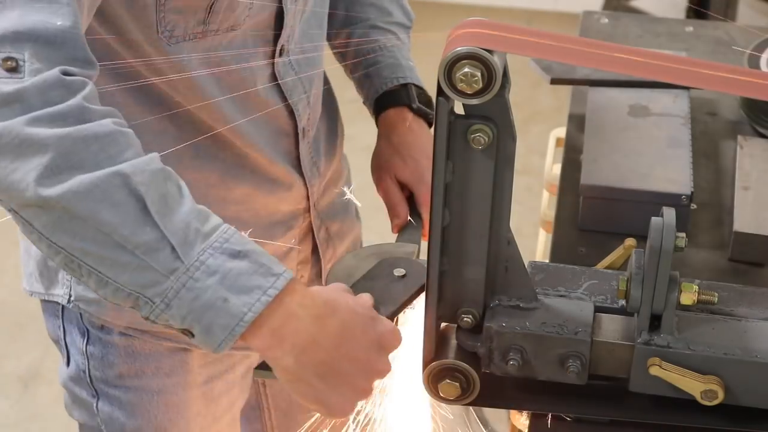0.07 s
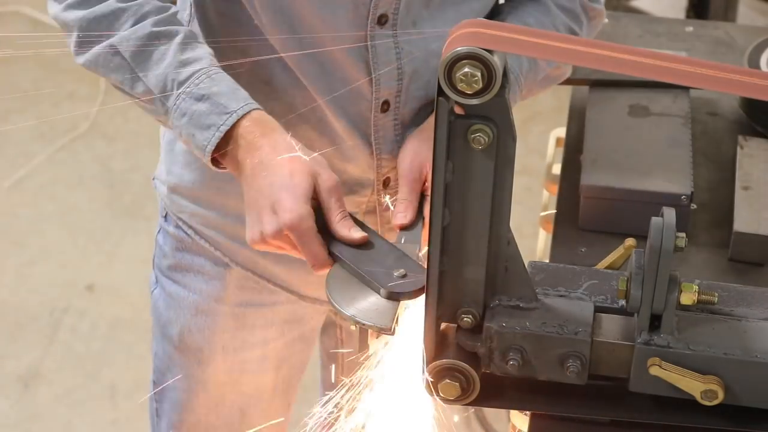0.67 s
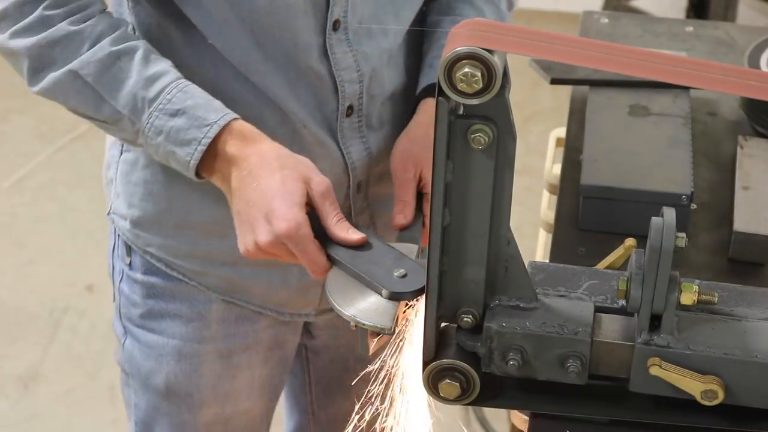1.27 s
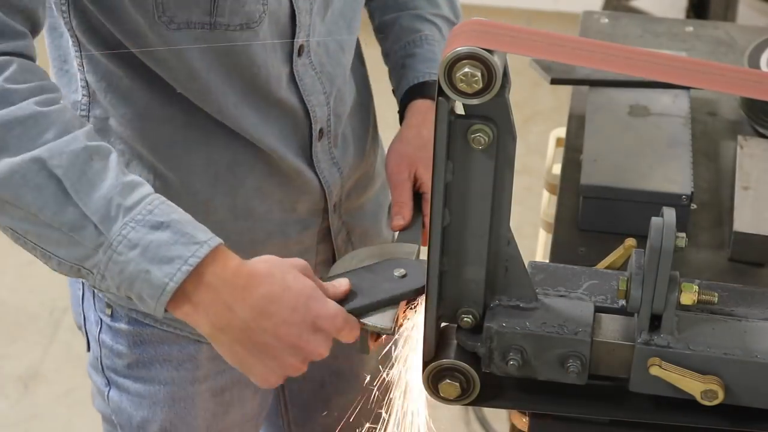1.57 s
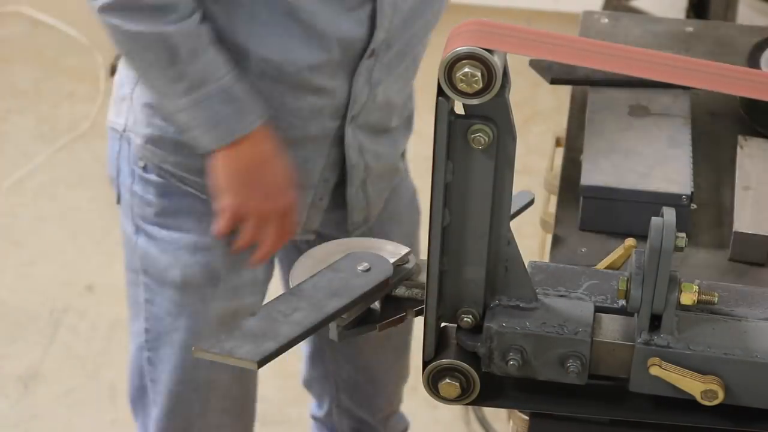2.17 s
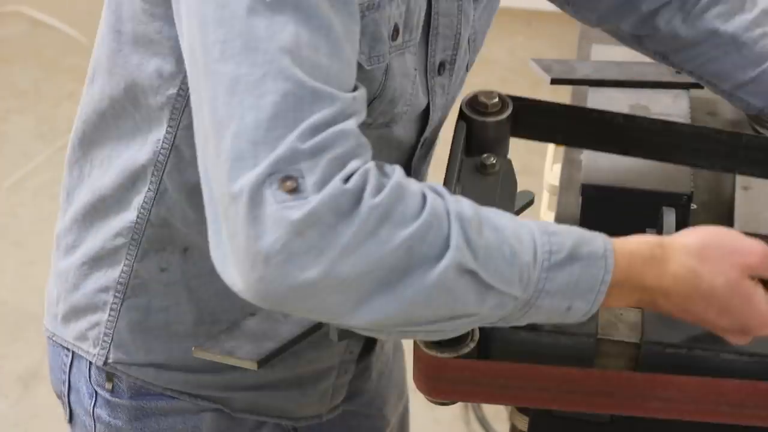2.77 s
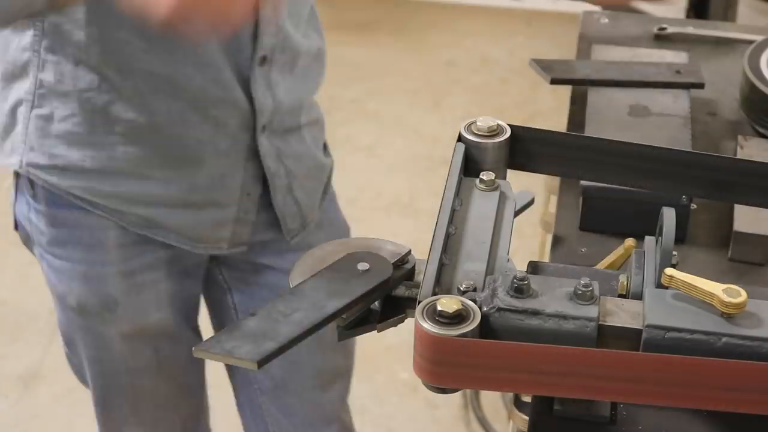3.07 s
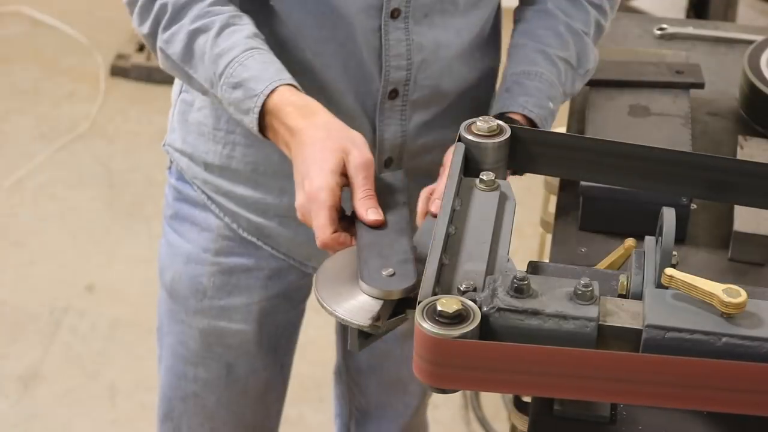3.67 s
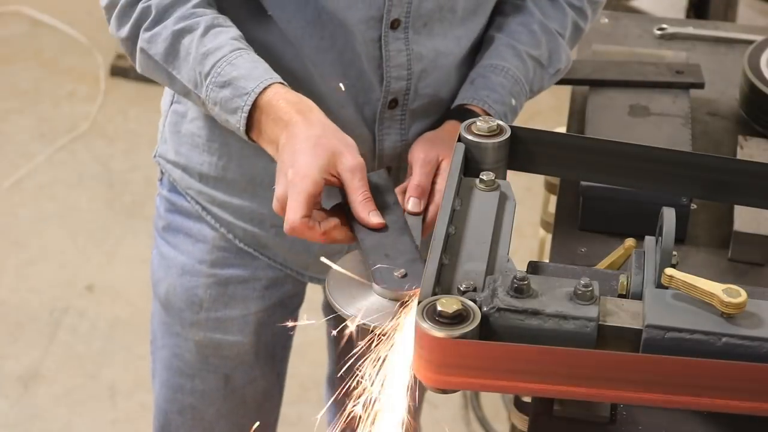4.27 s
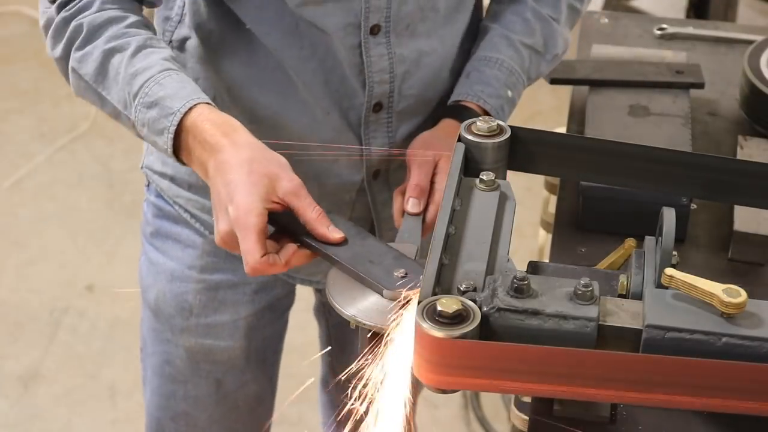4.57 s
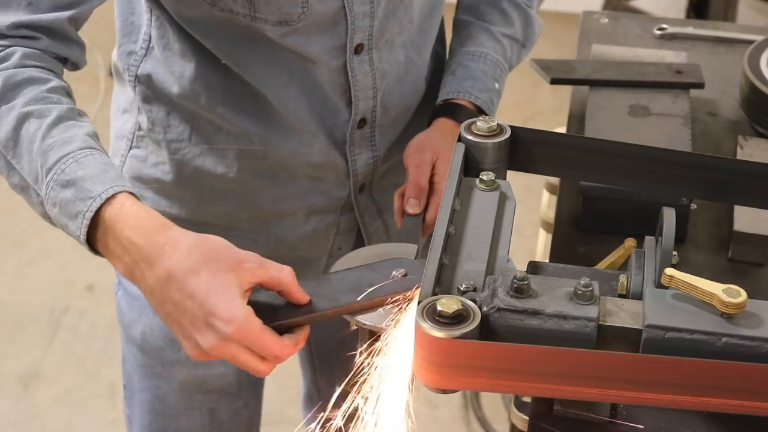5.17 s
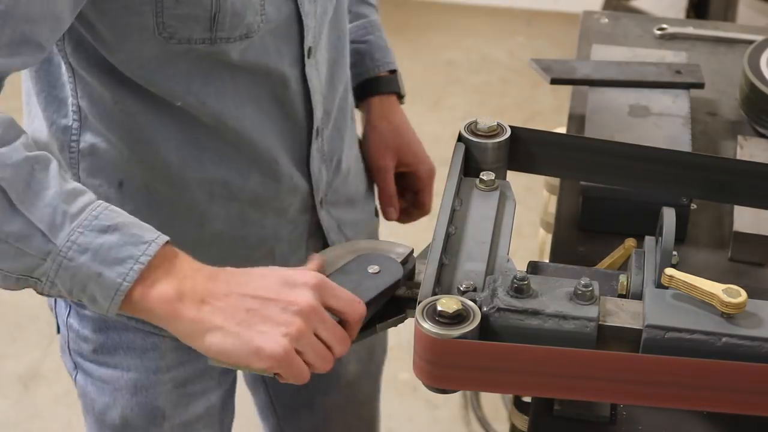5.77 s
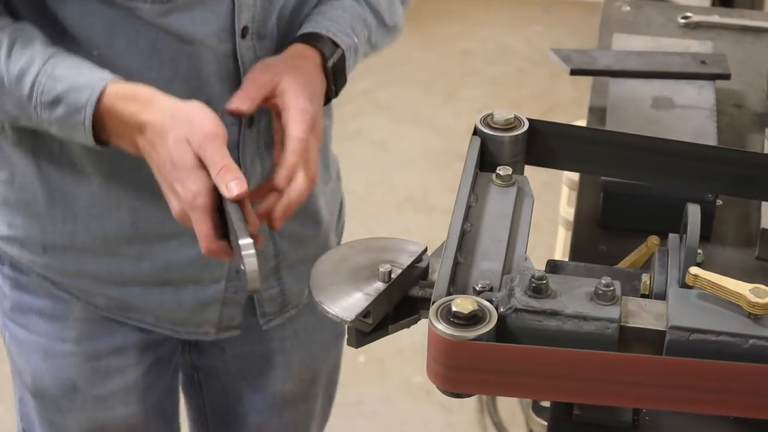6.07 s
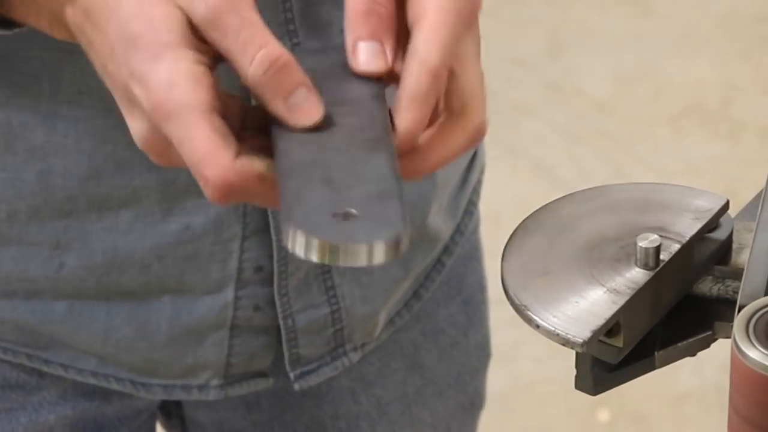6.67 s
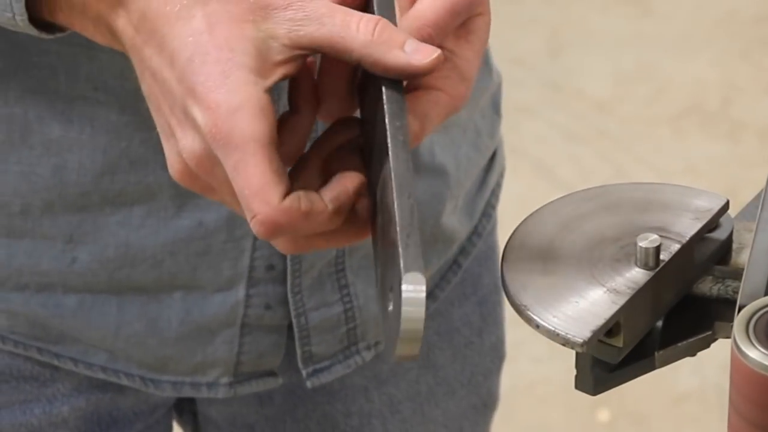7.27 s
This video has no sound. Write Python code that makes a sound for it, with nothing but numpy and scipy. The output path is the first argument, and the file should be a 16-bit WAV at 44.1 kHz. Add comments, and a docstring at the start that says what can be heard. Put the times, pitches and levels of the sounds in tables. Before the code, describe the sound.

A belt grinder whines, sped up and high-pitched, while a steel plate hisses and screeches against it in two passes. The machine winds down, and its metal arm is moved and clamped with a clatter of clicks and knocks. It runs up again for another, softer grinding pass. Then the sound drops abruptly to a lower, fuller, fluttering hum of the free-running belt, heard close in a quiet workshop.

```python
"""A belt grinder in time-lapse, every pitch raised: the belt laps about 102 times a second.
A steel plate is pressed on twice, hissing and screeching under the grit while the wheels sing.
The machine coasts to rest, its arm is swung over and clamped with a clatter of knocks,
then it runs up and grinds again. At about 6 s the time-lapse drops to a quarter of its pace
and the belt runs free, lower and fuller, over a quiet workshop."""
import sys
import numpy as np
from scipy import signal
from scipy.fft import rfft, irfft, next_fast_len
from scipy.io import wavfile

SR = 44100
rng = np.random.default_rng(int(sys.argv[2]) if len(sys.argv) > 2 else 0)


def wav_out(sig):
    """Save sig, one row per channel (or a flat mono array), as 16-bit PCM at SR to the path in sys.argv[1]."""
    wavfile.write(sys.argv[1], SR, np.round(np.clip(np.atleast_2d(sig).T, -1, 1) * 32767).astype(np.int16))


N = 331191
T = np.arange(N) / SR
FAST_LAPS_PER_S, SLOW_LAPS_PER_S = 102.28, 25.595
SWING_S, PACE_CHANGE_S = 2.8, 6.052


# The hand's passes. Each row: start and end, press-on and lift-off time, moment and width of the
# hardest push, all in seconds; dB lighter away from that push; hiss, ring and screech level in dB.
PASSES = [(-.05, 0.027, .02, 0.024, -5, .1, 0, -35.5, -35, -34),
          (0.074, 0.95, 0.041, .06, .66, 0.18, 5, -34, -39.5, -33.5),
          (1.124, 1.869, .1, 0.066, 1.4, 0.24, 12.5, -42.5, -40.5, -36.5),
          (4.189, 5.621, .1, 0.092, 4.8, 0.36, 0, -41, -46.5, -44)]
def pressing(start, end, on_s, off_s, hardest_s, push_s, lighter_db):
    """One pass of the hand: contact (0-1) comes and goes, and pressure (dB) swells in one push."""
    contact = np.clip((T - start) / on_s, 0, 1) * np.clip((end - T) / off_s, 0, 1)
    return contact, lighter_db * (np.exp(-((T - hardest_s) / push_s) ** 2) - 1)


# The plate rings differently in each grip. Each row: pitch in Hz, width in Hz, relative level in dB,
# dB gained per second as the contact slides along the edge.
FIRST_GRIP = [(816, 13, -7.5, -1), (1803, 113, 4.5, 0), (1955, 45, 1, 21), (2055, 51, 6.5, 6),
              (3013, 144, 5.5, -10), (4910, 260, 1, -2), (5027, 100, 6, 2), (5260, 41, 8, 2),
              (10100, 95, -5, -11), (10700, 220, -4.5, -10), (12400, 410, -11, 4)]
SECOND_GRIP = [(1768, 190, -2, 4), (2005, 140, -0.5, 7), (3000, 106, -3.5, 4), (4825, 160, 2, 18),
               (5170, 210, -1, 11), (6960, 580, -10.5, 8), (9600, 260, -9, 5), (12140, 400, -4.5, 16)]
THIRD_GRIP = [(974, 210, -8, 3), (1720, 640, -4, 1.5), (2262, 26, 10, 0), (3200, 630, -7.5, -3),
              (4320, 98, 1.5, 1), (5030, 400, -2.5, -6), (10370, 480, -1.5, 2), (15200, 300, 0.5, 2)]
def grinding(laps):
    """Grit tears at the steel: a bright hiss, with the plate ringing and screeching in step."""
    out, screech_hz = np.zeros(N), 4000
    follow = (0.64, 0.43, 1)  # hiss, ring, screech: dB per dB of pressure
    for row, grip in zip(PASSES, (FIRST_GRIP, FIRST_GRIP, SECOND_GRIP, THIRD_GRIP)):
        start, end = row[:2]
        contact, pressure_db = pressing(*row[:7])
        slide_s = np.clip(T, start, end) - (start + end) / 2
        bite = grit(laps, repeat=.58, wear_per_s=6, uneven_db=1.5, lumpy_db=2)
        chatter = grit(laps, repeat=0.84, wear_per_s=4, uneven_db=0.5, lumpy_db=1.8)
        hiss = coloured(bite, [(30, -10), (120, -20), (500, -30), (900, -25.5), (1600, -5.5),
                               (4000, 1.5), (8000, 0.5), (11000, 2), (16000, 4.5)])
        modes = [(hz, gain_of(db + trend_db * slide_s) * ring_twice(chatter, [(hz, width, 0)]))
                 for hz, width, db, trend_db in grip]
        ringing = sum(mode for hz, mode in modes if hz < screech_hz)
        screech = sum(mode for hz, mode in modes if hz >= screech_hz)
        hand = contact * gain_of(.5 * drift(25))
        for layer, db, slope in zip((hiss, ringing, screech), row[7:], follow):
            out += hand * gain_of(db + slope * pressure_db) * layer / layer[contact > 0].std()
    return out


def grit(laps, repeat, wear_per_s, uneven_db, lumpy_db, harmonics=160, size=16384):
    """Grit on a closed belt: one pattern comes round each lap, wearing, mixed with fresh scraping."""
    place = np.arange(size) / size
    heights = gain_of(uneven_db * rng.standard_normal(harmonics)) * (np.arange(harmonics) > 4)
    loops = [irfft(heights * np.exp(2j * np.pi * rng.random(harmonics)), size) for _ in range(2)]
    old, new = (np.interp(laps, place, loop, period=1) for loop in loops)
    wear = drift(wear_per_s) / 2
    pattern = evened(old * np.cos(wear) + new * np.sin(wear))
    scrape = np.sqrt(repeat) * pattern + np.sqrt(1 - repeat) * rng.standard_normal(N)
    # thick and thin stretches of belt press harder and softer
    lumps = np.interp(laps, np.arange(20) / 20, evened(rng.standard_normal(20)), period=1)
    return evened(scrape * gain_of(lumpy_db * lumps))


def belt_speed():
    """Share of full speed: the belt coasts to rest, runs up evenly and sags under each pass."""
    off_s, coast_s, on_s, run_up_s = 2.117, .285, 3.08, .32
    sag_laps_per_s, sag_at_db = .3, -35  # speed lost at this level of hiss
    coasting = np.clip(1 - (T - off_s) / coast_s, 0, 1) ** 1.15
    running_up = np.clip((T - on_s) / run_up_s, 0, 1)
    sag = sag_laps_per_s * sum(pressing(*row[:7])[0] * gain_of(row[7] - sag_at_db) for row in PASSES)
    return np.maximum((coasting + running_up) * (1 - sag / FAST_LAPS_PER_S), .001)


# The bright rush of the fast belt. Each row: frequency in Hz, relative level in dB.
FAST_RUSH = [(15, -68), (25, -32), (361, -23.5), (473, -25), (857, -17), (929, -15), (1090, -9),
             (1220, -8.5), (1430, -12.5), (2390, -9), (3130, -12), (3680, -11), (3990, -10.5), (6490, -9),
             (15800, -9)]
# The steel platen's ring. Each row: pitch in Hz, width in Hz, relative level in dB.
PLATEN_MODES = [(1287, 100, -4.5), (1720, 68, 0), (4860, 340, 0.5)]
def machine(laps, speed):
    """The belt rushes over its ringing platen while wheels and bearing follow its speed."""
    halvings, upright = -np.log2(speed), T < SWING_S
    scrape = grit(laps, repeat=0.22, wear_per_s=8, uneven_db=1, lumpy_db=1.3)
    rush = gain_of(-39.5 - 5.5 * halvings + 0.54 * drift(30)) * coloured(scrape, FAST_RUSH)
    platen = gain_of(-59 - 2 * halvings) * evened(ring_twice(scrape, PLATEN_MODES))
    # a crawling belt only rattles; the wheels linger when coasting and come in late on the run-up
    moving = np.interp(speed, [.01, .15], [0, 1])
    singing = np.interp(speed, [.1, .8], [0, 1]) ** np.where(upright, .5, 2)
    whistling = np.interp(speed, [.1, .25], [0, 1])
    tones = singing * wheels(laps, speed, upright) + whistling * bearing(laps, upright)
    return rush + moving * platen + tones


# Three singing wheels. Each row: multiple of the lap rate, relative level in dB with the arm upright
# and swung over, dB gained while steel is pressed on, dB lost per halving of speed.
WHEEL_TONES = [(12, -56, -48.5, 2, 2), (37, -45.5, -43, -.5, 1.5), (61, -60, -48, -6, 16)]
# The lowest wheel beats against a near twin, first upright, then swung over. Each row: time of a dip
# in seconds, beat rate there in Hz, Hz lost per second, twin's strength from 0 to 1.
WHEEL_BEATS = [(1.11, 1.44, 0.075, 0.19), (3.77, 2.352, 0.45, 0.47)]
# Lesser machine tones. Each row: full-speed pitch in Hz, level in dB upright and swung over.
MACHINE_TONES = [(225, -81, -85), (304, -82.5, -80), (472, -70, -77), (601, -73, -75.5), (936, -63.5, -68),
                 (962, -84, -58), (1150, -79, -76), (1168, -85, -56), (1327, -57.5, -60.5),
                 (2250, -72, -56), (2333, -58, -60), (2457, -59.5, -58.5), (4815, -54.5, -54.5),
                 (6640, -59, -65), (10620, -55, -59), (11400, -51.5, -69)]
def wheels(laps, speed, upright):
    """The turning wheels sing over lesser machine tones, all falling in pitch as the belt slows."""
    out, halvings = np.zeros(N), -np.log2(speed)
    load = sum(pressing(*row[:7])[0] for row in PASSES)
    beat_db = np.where(upright, beating(*WHEEL_BEATS[0]), beating(*WHEEL_BEATS[1]))
    slack = 1 - speed ** 6  # a slack belt weakens the tones and breaks them up
    for k, (order, upright_db, swung_db, load_db, fade_db) in enumerate(WHEEL_TONES):
        db = np.where(upright, upright_db, swung_db) + load_db * load + (k == 0) * beat_db
        db += slack * (5 * drift(90) - 12) - fade_db * halvings
        song = tone(order * laps, db, waver_db=0.92, waver_per_s=30, slip=.06)
        out += radiated(order * FAST_LAPS_PER_S * speed) * song
    for hz, upright_db, swung_db in MACHINE_TONES:
        db = np.where(upright, upright_db, swung_db) - 3 * halvings + slack * (3 * drift(90) - 6)
        whine = tone(hz / FAST_LAPS_PER_S * laps, db, waver_db=0.4, waver_per_s=20, slip=0.16)
        out += radiated(hz * speed) / radiated(hz) * whine
    return out


def beating(dip_s, beat_hz, slowing, twin):
    """Level (dB) of two nearly equal tones drifting in and out of step."""
    turns = beat_hz * (T - dip_s) - slowing * (T - dip_s) ** 2 / 2
    return 20 * np.log10(abs(1 - twin * np.exp(2j * np.pi * turns)))


def radiated(hz):
    """The small frame hardly radiates low tones."""
    return 1 / np.sqrt(1 + (620 / hz) ** 8)


# The bearing's whistle. Each row: multiple of the lap rate (played rounded), relative level in dB
# upright and swung over.
BEARING_TONES = [(29, -49.5, -59), (66.6, -50.5, -66), (105, -59, -50.5)]
# Its housing. Each row: resonance in Hz, width in Hz, relative level in dB.
HOUSING_MODES = [(1000, 650, -3), (3320, 990, -7), (4880, 1050, -3.5), (5920, 370, -3.5)]
def bearing(laps, upright):
    """A bearing whistles, loudest while it sweeps through its housing's resonances."""
    whistle = np.zeros(N)
    for order, upright_db, swung_db in BEARING_TONES:
        db = np.where(upright, upright_db, swung_db)
        whistle += tone(round(order) * laps, db, waver_db=4.5, waver_per_s=90, slip=0.54)
    return ring_twice(whistle, HOUSING_MODES)


# The slow belt's fuller rush, its chirp and its hum. Each row: frequency in Hz, relative level in dB.
SLOW_RUSH = [(24, -89), (40, -52), (140, -26.5), (230, -24), (261, -12), (303, -4.5), (380, -14),
             (582, -11), (868, -17), (935, -9.5), (1010, -14), (1540, -12), (3890, -11), (4880, -7.5),
             (11100, -14.5), (15800, -21)]
CHIRP_TONES = [(4786, -45.5), (4963, -50.5), (7190, -54), (8958, -50), (11600, -55), (14100, -54)]
SLOW_HUM = [(236.9, -56), (307.2, -42), (333, -52), (538.3, -71), (584.3, -50), (689.1, -65), (946, -39.5),
            (1077, -59), (1200, -52.5), (1561, -45.5)]
def free_belt():
    """At the slow pace the laps are heard as a flutter, and the belt chirps on the platen twice a lap."""
    bump_s, dip_s = 6.903, 6.619
    laps = SLOW_LAPS_PER_S * T + 0.0002 * drift(18)
    scrape = grit(laps, repeat=0.65, wear_per_s=2.967, uneven_db=4, lumpy_db=-0.7, harmonics=640)
    rush = coloured(scrape, SLOW_RUSH)
    bumps = evened(np.exp(1.6 * np.cos(2 * np.pi * 2 * (laps - SLOW_LAPS_PER_S * bump_s))))
    # the platen's band is scooped out, so it falls quiet between the bumps
    out = gain_of(-30.5) * (rush - .5 * ring(rush, [(4770, 2350, 0)]))
    for hz, db in CHIRP_TONES:
        out += bumps * tone(hz * T, db, waver_db=0.5, waver_per_s=50, slip=0.9)
    for hz, db in SLOW_HUM:
        out += tone(hz * T, db - 1.1, waver_db=0.5, waver_per_s=30, slip=0.36)
    return out * np.clip(abs(T - dip_s) / 0.013, 0, 1)  # the level dips briefly


# The arm is swung over and clamped. Each row: start in seconds, relative click and thud level in dB.
ARM_KNOCKS = [(2.4522, -32.5, -66), (2.4695, -42, -77), (2.508, -37, -74), (2.5146, -33, -79),
              (2.5447, -42, -83), (2.565, -38.5, -75), (2.589, -46, -69), (2.597, -41, -60),
              (2.6104, -52, -48), (2.719, -50, -47.5), (2.752, -58, -48), (2.8529, -50, -71),
              (2.8812, -56, -46.5), (2.972, -56, -70), (3.036, -55, -81), (3.063, -42, -54.5),
              (3.093, -39.5, -62), (3.1228, -33, -65)]
# The steely click. Each row: resonance in Hz, width in Hz, relative level in dB.
ARM_MODES = [(2940, 1500, -3), (4800, 1000, -3), (7600, 1000, -2), (8840, 1400, 3), (11200, 3900, 1.5),
             (14100, 2000, -9)]
# The arm's lingering notes. Each row: pitch in Hz, seconds to fall 60 dB, relative level in dB.
ARM_RING = [(480, 0.081, -45), (3100, 0.1, -18), (4700, 0.14, -27), (7430, 0.2, -20)]
# The frame's dull thud. Each row: frequency in Hz, relative level in dB.
FRAME_THUD = [(60, -38), (250, -16), (500, 3.5), (1000, 9), (1800, 4), (3000, -7), (6000, -8), (16000, -35)]
def arm_knocks():
    """Each blow clicks, rings the steel arm and thuds in the frame; the loose arm rebounds once."""
    out, t = np.zeros(N), np.arange(SR // 4) / SR
    delays_s, rebound_db = rng.uniform(.012, .031, len(ARM_KNOCKS)), -22
    rebounds = [(start + delay, click_db + rebound_db, thud_db + rebound_db)
                for (start, click_db, thud_db), delay in zip(ARM_KNOCKS, delays_s)]
    click_shape = (np.exp(-t / 0.0049) + gain_of(-20.5) * np.exp(-t / 0.047)) * (1 - np.exp(-t / 0.00041))
    thud_shape = np.exp(-t / 0.028) * (1 - np.exp(-t / 0.0012))
    notes = sum(gain_of(db - 60 * t / t60) * np.sin(2 * np.pi * hz * t) for hz, t60, db in ARM_RING)
    for start, click_db, thud_db in list(ARM_KNOCKS) + rebounds:
        click = evened(ring(rng.standard_normal(len(t)), ARM_MODES)) * click_shape
        thud = coloured(rng.standard_normal(len(t)), FRAME_THUD) * thud_shape
        knock = gain_of(click_db - 6.5) * (click + notes) + gain_of(thud_db - 9.5) * thud
        at = round(start * SR)
        out[at:at + len(t)] += knock
    return out


# The room tone. Each row: frequency in Hz, relative level in dB.
ROOM_TONE = [(15, -45), (25, -8), (53, -27), (342, -17), (414, -6), (905, -2), (1640, -3), (3580, -8.5),
             (9210, -11.5), (15800, -16)]
def workshop():
    """A faint, steady bed of noise from the quiet workshop."""
    return gain_of(-74) * coloured(rng.standard_normal(N), ROOM_TONE)


def tone(turns, db, waver_db, waver_per_s, slip):
    """A rotating part's tone, wavering in strength and slipping in phase (radians)."""
    level = gain_of(db + waver_db * drift(waver_per_s))
    return np.sqrt(2) * level * np.sin(2 * np.pi * turns + slip * drift(waver_per_s))


def ring(x, modes):
    """Drives a bank of (Hz, width in Hz, dB) resonances."""
    return sum(gain_of(db) * signal.lfilter(*signal.iirpeak(hz, hz / width, SR), x)
               for hz, width, db in modes)


def ring_twice(x, modes):
    """Two trips through the resonances keep the valleys between them dark."""
    return ring(ring(x, modes), modes)


def coloured(x, points):
    """Filters by a (Hz, dB) spectrum, to rms 1."""
    hz, db = np.transpose(points)
    size = next_fast_len(len(x))
    shape = np.interp(np.log(np.fft.rfftfreq(size, 1 / SR) + 1), np.log(hz), db)
    return evened(irfft(rfft(x, size) * gain_of(shape), size)[:len(x)])


def drift(per_s):
    """Smooth random motion of rms 1."""
    knots = rng.standard_normal(4096)
    return evened(np.interp(T * per_s, np.arange(len(knots)), knots))


def gain_of(db):
    """Decibels to amplitude."""
    return 10 ** (np.asarray(db) / 20)


def evened(x):
    """Scales to rms 1."""
    return x / np.sqrt(np.mean(x ** 2) + 1e-20)


def scene():
    """The fast stretch gives way to the slow one; the sound is the same in both ears."""
    speed = belt_speed()
    laps = np.cumsum(FAST_LAPS_PER_S * speed) / SR + 0.0023 * drift(30)
    fast = machine(laps, speed) + grinding(laps) + arm_knocks()
    crossfade = np.clip((T - PACE_CHANGE_S) / .006 + .5, 0, 1)
    room = workshop()
    mono = (1 - crossfade) * fast + crossfade * free_belt() + room
    return np.array([mono, mono])


def record(dry):
    """A steep low-pass takes off the very top of the treble."""
    edge_hz = 15850
    lowpass = signal.firwin(1023, edge_hz, window=("kaiser", 9), fs=SR)
    return signal.oaconvolve(dry, lowpass[None], "same")


dry = scene()
out = record(dry)
wav_out(out)
```